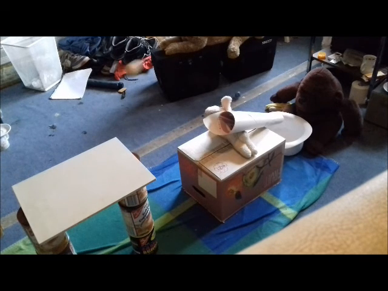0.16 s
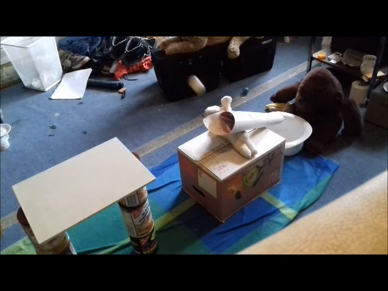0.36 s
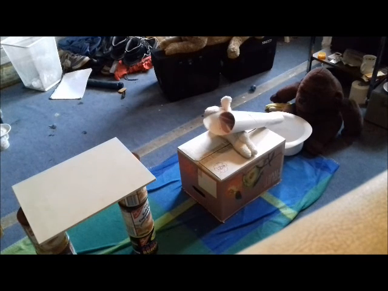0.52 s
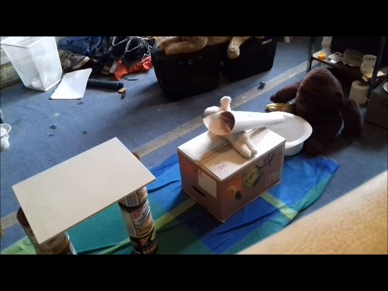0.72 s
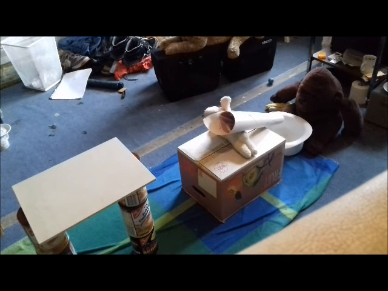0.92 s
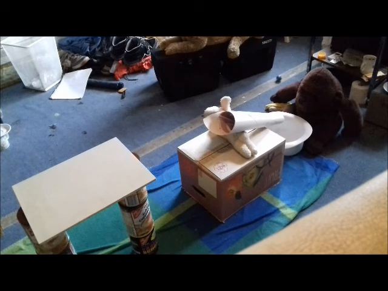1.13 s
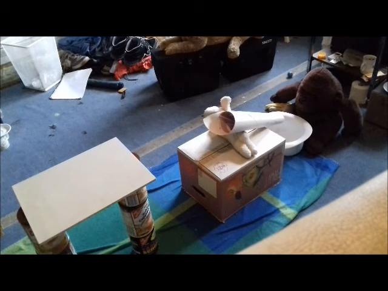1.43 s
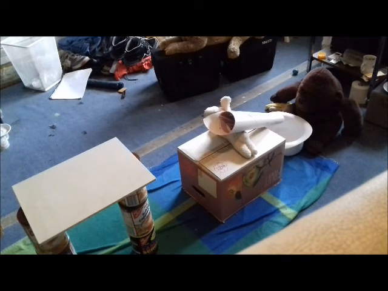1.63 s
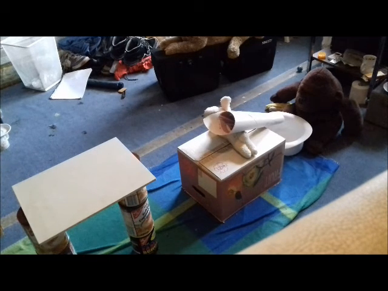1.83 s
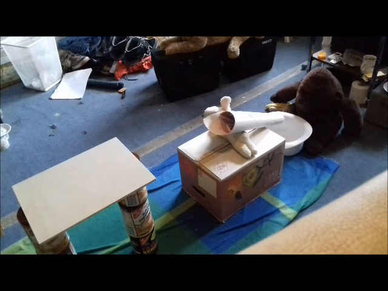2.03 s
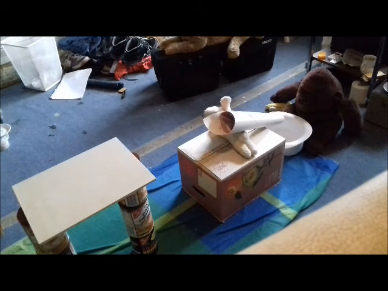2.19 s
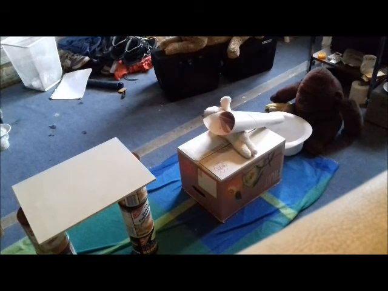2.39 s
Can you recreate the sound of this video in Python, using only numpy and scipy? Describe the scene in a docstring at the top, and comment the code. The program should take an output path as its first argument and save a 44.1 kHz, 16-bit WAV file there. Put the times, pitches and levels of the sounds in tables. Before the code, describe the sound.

A light ball strikes a thin board with one loud, briefly ringing knock, then a sharper click and soft thumps recede over carpet; small ticks, later faint plastic rubbing and taps, in a quiet hissy room.

```python
"""A brief rustle dies away over steady hiss, a small tick sounds, then a light ball knocks a thin board.
The board rings as a sum of decaying modes; the ball bounces off across a carpeted room in clicks and
short thumps, while a small thing ticks to rest nearby. Late on, something rubs and taps hollow plastic:
random grains and pulses excite its resonances. Near echoes and a short diffuse tail form the room;
shaped noise makes the air and the hiss of a small camera microphone."""
import sys
import numpy as np
from scipy import signal
from scipy.fft import rfft, irfft
from scipy.io import wavfile

SR = 44100
rng = np.random.default_rng(int(sys.argv[2]) if len(sys.argv) > 2 else 0)


def voltage_ratio(decibels):
    """Convert decibels (scalar or array-like) to amplitude ratios, 20 dB per decade."""
    exponent = np.asarray(decibels, float) / 20
    return 10 ** exponent


def wav_out(sig):
    """Save sig, one row per channel (or a flat mono array), as 16-bit PCM at SR to the path in sys.argv[1]."""
    wavfile.write(sys.argv[1], SR, np.round(np.clip(np.atleast_2d(sig).T, -1, 1) * 32767).astype(np.int16))


N = 112454

# Reflections shared by the far knocks and the plastic taps. Each row: delay in seconds, level in dB.
FAR_ECHOES = [(.0022, 5), (.0047, -4.5), (.0095, -11.5), (0.0159, -1.5), (0.0231, 2)]


def level(x, db):
    """Root-mean-square scaling: the signal is given the stated rms in dB re full scale."""
    return x * voltage_ratio(db) / np.sqrt(np.mean(x ** 2))


def colour(x, points, size=4096):
    """Minimum-phase filtering: the folded cepstrum turns (Hz, dB) points into a causal response."""
    hz, db = np.array(points).T
    bins_hz = np.arange(size // 2 + 1) * SR / size
    gain_db = np.interp(np.log(bins_hz + 1), np.log(hz), db)
    cepstrum = irfft(np.log(voltage_ratio(gain_db)), size)
    # fold the negative times onto the positive ones
    cepstrum[1:size // 2] *= 2
    cepstrum[size // 2 + 1:] = 0
    response = irfft(np.exp(rfft(cepstrum)), size)
    return signal.fftconvolve(np.atleast_2d(x), response[None], axes=1)[:, :N]


def ring(at, hz, db, t60):
    """Damped free vibration: a sine starts at a given time and falls 60 dB in t60 seconds."""
    t = np.maximum(np.arange(N) / SR - at, 0)
    return voltage_ratio(db - 60 * t / t60) * np.sin(2 * np.pi * hz * t)


def swelling_ring(at, hz, db, t60, rise_s, rise_share=1):
    """Gradual build-up: subtracting a fast-decaying sine lets the mode swell with time constant rise_s."""
    return ring(at, hz, db, t60) - rise_share * ring(at, hz, db, rise_s * np.log(1000))


def push(at, db, ms):
    """Contact force: a Gaussian pulse of standard deviation ms; a longer contact is duller."""
    from_peak_ms = (np.arange(N) / SR - at) * 1000
    return voltage_ratio(db) * np.exp(-.5 * (from_peak_ms / ms) ** 2)


def room(x, wet_db, echoes=(), t60=0.26):
    """Room response: direct sound, early reflections and an exponentially decaying diffuse tail."""
    rise_s, width_db = 0.0031, -69  # time constant of the tail's build-up; side re mid tail
    t = np.arange(SR // 2) / SR
    envelope = voltage_ratio(-60 * t / t60) * (1 - np.exp(-t / rise_s))
    tail = rng.standard_normal((2, len(t))) * envelope
    mid, side = voltage_ratio(wet_db) * tail / np.sqrt(np.sum(tail[0] ** 2))
    early = sum(voltage_ratio(db) * np.exp(-2 * (t * SR - lag * SR) ** 2) for lag, db in [(0, 0), *echoes])
    both = early + mid + voltage_ratio(width_db) * side * np.array([[1], [-1]])
    return signal.fftconvolve(x[None], both, axes=1)[:, :N]


def room_air():
    """Stationary broadband noise: one shaped random signal is common to both channels."""
    # Spectrum of the air. Each row: frequency in Hz, gain in dB.
    air_colour = [(18, -54), (30, -40), (76, -21), (104, -10.5), (322, -8), (747, -8), (3150, -14),
                  (4120, -12.5), (6000, -33), (7800, -64), (13200, -120)]
    return level(colour(rng.standard_normal(N), air_colour), -64.5)


def hiss():
    """Partly correlated noise: independent mid and side signals make the channels differ."""
    # Spectra of the common and the opposed hiss. Each row: frequency in Hz, gain in dB.
    mid_colour = [(20, -9), (60, 2.5), (300, -2.5), (1000, 0.5), (5000, -15.5), (8500, -10.5),
                  (9500, -13.5), (10000, -19.5), (10600, -12), (12000, -11), (15000, -13), (15600, -16)]
    side_colour = [(20, -50), (60, -9.5), (300, -6), (1000, -7), (4000, -11), (6000, -21.5), (9400, -19),
                   (10000, -36), (10700, -18.5), (12000, -21.5), (14000, -16.5), (15000, -42), (15600, -14)]
    mid = level(colour(rng.standard_normal(N), mid_colour), -71)
    side = level(colour(rng.standard_normal(N), side_colour), -67)
    return mid + side * np.array([[1], [-1]])


def grains():
    """Random-impulse excitation: friction as dense clicks of uneven size and either sign."""
    per_second, spread_db = 7600, 2  # spread: mean of the exponentially distributed dB sizes
    chance = rng.random((2, N))
    present = chance[0] < per_second / SR
    size = voltage_ratio(-spread_db * np.log(1 - chance[1]))
    return present * size * rng.choice([-1, 1], N)


def effort(rows):
    """Amplitude modulation: gain from (s, dB) rows, at -120 dB outside them."""
    return voltage_ratio(np.interp(np.arange(N) / SR, *np.array(rows).T, left=-120, right=-120))


def hollow(x):
    """Parallel resonance: band-pass modes of a hollow plastic thing add to the plain sound."""
    # Its resonances. Each row: frequency in Hz, bandwidth in Hz, gain in dB.
    resonances = [(660, 240, 8.5), (1018, 205, 5), (1463, 91, -6.5), (2530, 254, 6), (3350, 1270, 4),
                  (4183, 235, 13.5)]
    out = voltage_ratio(-1) * x
    for hz, width, db in resonances:
        out = out + voltage_ratio(db) * signal.lfilter(*signal.iirpeak(hz, hz / width, SR), x)
    return out


def rustle():
    """Source and resonator: rubbing grains and taps excite the plastic; a bright crinkle is added."""
    # Two spells of rubbing effort, and the faint crinkle. Each row: time in seconds, gain in dB.
    spells = [
        [(0, -45), (.08, -116)],
        [(1.775, -86), (1.79, -63.5), (1.815, -48.5), (1.832, -59), (1.842, -42), (1.857, -43.5), (1.875, -36),
         (1.89, -50), (1.918, -52), (1.94, -39.5), (1.965, -52.5), (2.01, -50), (2.06, -103), (2.085, -48),
         (2.13, -74), (2.17, -63)],
    ]
    crinkle_effort = [(.755, -73), (.772, -45), (.81, -50), (.854, -62), (.875, -48), (.895, -45),
                      (.92, -88), (.95, -50), (.96, -78)]
    # Spectra of their grains. Each row: frequency in Hz, gain in dB.
    rubbing_colour = [(100, -25), (220, 8), (450, 0.5), (1000, 3), (1600, 3), (4300, -5), (7000, -0.5),
                      (15000, 6.5)]
    crinkle_colour = [(200, -13), (500, 2), (1200, -7), (2300, -6.5), (3000, -7.5), (4300, -4), (7000, -4),
                      (15000, 0)]
    # Taps on the plastic. Each row: time in seconds, level in dB.
    tap_rows = [(1.8670, -43), (1.8758, -49), (1.8808, -38.5), (1.937, -45.5), (2.0897, -49),
                (2.2338, -35.5), (2.3350, -51.5)]
    # Its low modes. Each row: frequency in Hz, level in dB re the tap, t60 in seconds.
    low_modes = [(625, -6, .08), (960, -12, .07)]
    rubbing = level(hollow(colour(grains(), rubbing_colour)[0]), 0)
    rubbing = rubbing * sum(effort(rows) for rows in spells)
    crinkle = level(colour(grains(), crinkle_colour)[0], 0) * effort(crinkle_effort)
    taps = hollow(sum(push(at, db, ms=0.015) for at, db in tap_rows))
    body = sum(ring(at, hz, db + mode_db, t60) for at, db in tap_rows for hz, mode_db, t60 in low_modes)
    return room(rubbing + crinkle, 0) + room(taps, 16.3, FAR_ECHOES) + room(body, -0.78)


def ticks():
    """Impact on a small stiff body: a contact pulse starts a brief pitch and short high modes."""
    # Ticks of a small thing. Each row: time in seconds, level in dB, pitch in Hz.
    tick_rows = [(0.0950, -46, 2120), (0.2845, -43, 4400), (.3700, -52, 3600), (0.445, -52, 3950),
                 (0.506, -52, 3630), (.5660, -54.5, 3400), (.6180, -58, 3200)]
    # Its high modes. Each row: frequency in Hz, level in dB re the tick, t60 in seconds.
    high_modes = [(9560, 11, 0.0095), (11600, 11.5, 0.0091)]
    # Near surfaces. Each row: delay in seconds, level in dB.
    near_echoes = [(.0055, 1.5), (.0085, 4), (.016, -5)]
    out = 0
    for at, db, hz in tick_rows:
        pitch = ring(at, hz, db, t60=.004)
        contact = push(at, db + 5, ms=0.022)
        top = sum(ring(at, f, db + top_db, t60) for f, top_db, t60 in high_modes)
        out = out + room(pitch + contact + top, 6.5, near_echoes)
    return out


def knocks():
    """Repeated impact: each bounce is a click and a damped thump; the first, on something hard, rings."""
    # Bounces further off. Each row: time in seconds, click level in dB before colouring,
    # thump level in dB, thump frequency in Hz, thump t60 in seconds.
    bounces = [(0.6561, -15, -44, 460, 0.02), (0.799, -54, -46.5, 484, 0.027),
               (0.9736, -30, -25.5, 413, 0.033), (1.0539, -36, -22, 179, 0.01),
               (1.098, -41.5, -40.5, 197, 0.021), (1.2063, -44, -36.5, 228, 0.017)]
    # Spectrum of the clicks. Each row: frequency in Hz, gain in dB.
    knock_colour = [(150, -14), (450, 6), (640, -6), (880, 8.5), (1600, -4.5), (3000, -3.5), (4500, -10),
                    (7000, -2), (10000, -6), (15000, 5)]
    # What ball and hard surface add to the first click: a list of frequencies in Hz,
    # then for each of them a row: level in dB re the click, t60 in seconds.
    shell_hz = [724, 880, 1043, 1209, 1451, 3960, 4400]
    shell_modes = [(-24, 0.035), (-23, 0.01), (-31, 0.041), (-28.5, .055), (-38.5, 0.15), (-11, 0.0033),
                   (-25.5, 0.017)]
    # Swelling ring after that click. Each row: frequency in Hz, level in dB, t60 in seconds.
    box_modes = [(442, -22, .14), (490, -27, .11)]
    hard_s, hard_db = bounces[0][:2]
    shell = sum(ring(hard_s, f, hard_db + db, t60) for f, (db, t60) in zip(shell_hz, shell_modes))
    box = sum(swelling_ring(hard_s, f, db, t60, rise_s=.011) for f, db, t60 in box_modes)
    out = room(box, -14) + room(shell, 7.4, FAR_ECHOES)
    for at, click_db, thump_db, hz, t60 in bounces:
        click = colour(push(at, click_db, ms=0.018), knock_colour)[0]
        thump = ring(at, hz, thump_db, t60)
        out = out + room(click, 14, FAR_ECHOES)
        out = out + room(thump, 1, [(.0095, -3.4)], t60=0.23)
    return out


def board():
    """Modal superposition: a blow clicks and sets the plate's modes ringing, the main one swelling."""
    # The blow: time in seconds, click level in dB before colouring, reference level of the ring in dB.
    at, click_db, ring_db = (.1313, -2.5, -9.5)
    # The main mode: frequency in Hz, t60 in seconds, time constant of its build-up in seconds.
    main_hz, main_t60, rise_s = (615.5, .2, .006)
    # The other modes: a list of frequencies in Hz, then for each of them a row:
    # level in dB re the ring level, t60 in seconds.
    mode_hz = [435, 726, 781, 839, 899, 1110, 1335, 1403, 1467, 1563, 1655, 2016, 3140, 3500]
    mode_rows = [(-18, 0.17), (-23, 0.31), (-14, .13), (-17.5, 0.22), (-15.5, 0.14), (-20.5, 0.056),
                 (-21, 0.24), (-28, 0.074), (-19.5, 0.11), (-30, 0.21), (-23.5, 0.22), (-28, 0.21),
                 (-20.5, 0.12), (-23.5, .15)]
    # Spectrum of the click. Each row: frequency in Hz, gain in dB.
    click_colour = [(100, -44), (250, 2.5), (500, 3), (1500, 1), (2400, -2.5), (2680, -12), (3100, -7.5),
                    (6000, -7.5), (9000, -3), (12000, 9.5), (15000, 4)]
    # Near surface. Each row: delay in seconds, level in dB.
    board_echoes = [(.0085, 5)]
    modes = sum(ring(at, f, ring_db + db, t60) for f, (db, t60) in zip(mode_hz, mode_rows))
    modes = modes + swelling_ring(at, main_hz, ring_db, main_t60, rise_s, rise_share=0.99)
    click = colour(push(at, click_db, ms=0.02), click_colour)[0]
    return room(click, 12.5, board_echoes) + room(modes, -17)


def scene():
    """Linear superposition: the sounds of all sources add in the room."""
    return rustle() + ticks() + knocks() + board()


def roll_off(x):
    """The treble ends steeply here."""
    return signal.sosfilt(signal.butter(12, 15640, fs=SR, output="sos"), x)


def record(dry):
    """Linear transduction: the microphone filters the sound; air and hiss add, then the top is cut."""
    # Response of the microphone. Each row: frequency in Hz, gain in dB.
    microphone = [(30, -77), (100, -28), (170, -9.5), (270, -7), (600, -3), (1300, 0), (2000, 3.5),
                  (2650, -3.5), (3300, 1), (4700, 0.5), (5200, -10), (5800, -19.5), (6400, -17),
                  (7000, -22), (7600, -35), (8300, -25.5), (9400, -30.5), (10000, -38), (10800, -33.5),
                  (12000, -31), (14000, -29), (15000, -31), (15600, -31)]
    heard = colour(dry, microphone) + room_air() + hiss()
    low_pass = signal.ellip(8, .2, 60, 15600, fs=SR, output="sos")  # ripple, stop dB; edge Hz
    mix = signal.sosfilt(low_pass, heard) - .0005  # a small constant offset
    return roll_off(mix)


dry = scene()
out = record(dry)
wav_out(out)
```